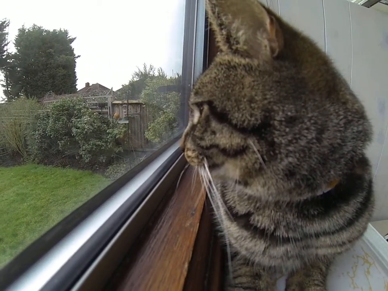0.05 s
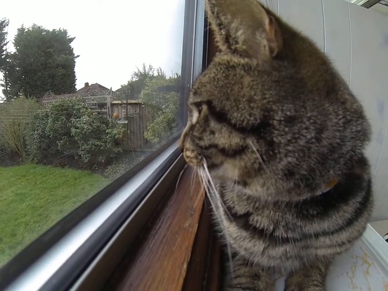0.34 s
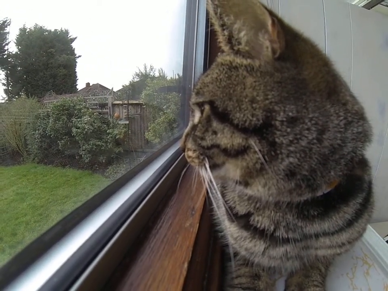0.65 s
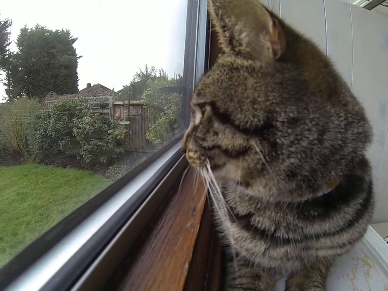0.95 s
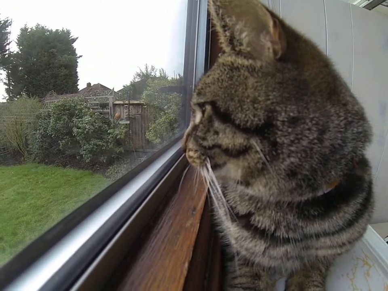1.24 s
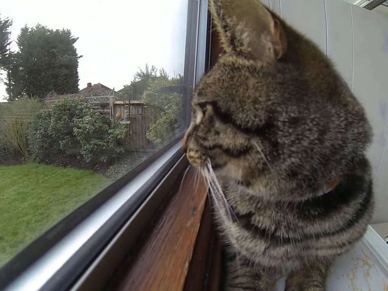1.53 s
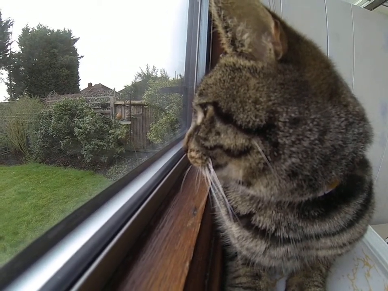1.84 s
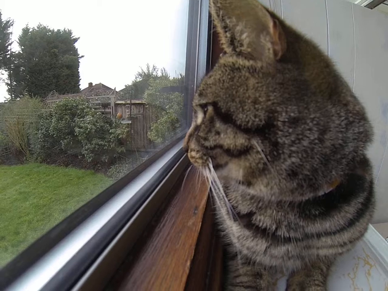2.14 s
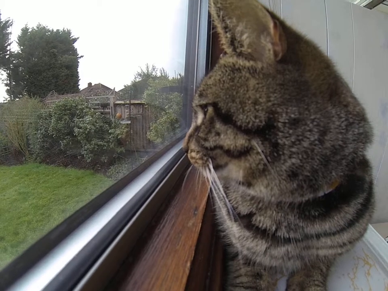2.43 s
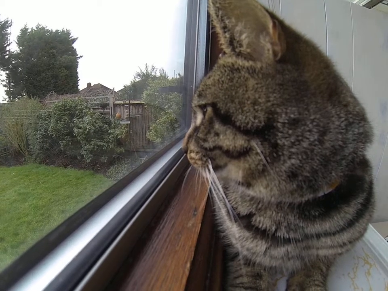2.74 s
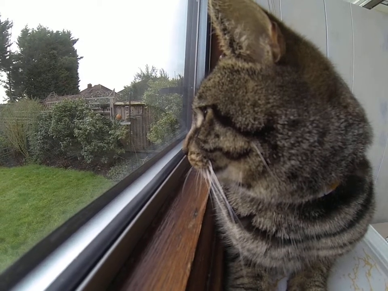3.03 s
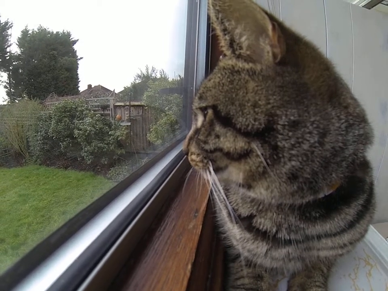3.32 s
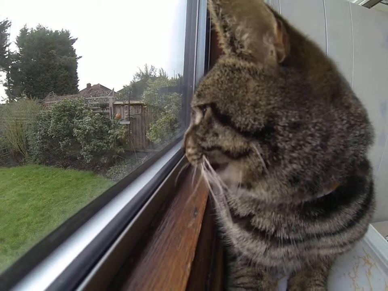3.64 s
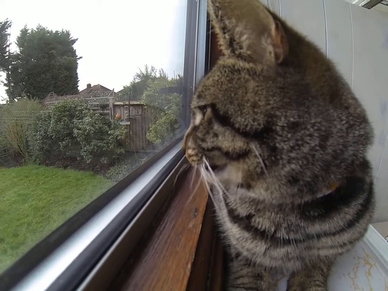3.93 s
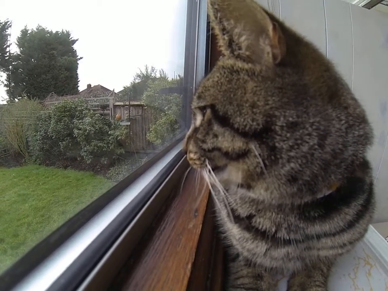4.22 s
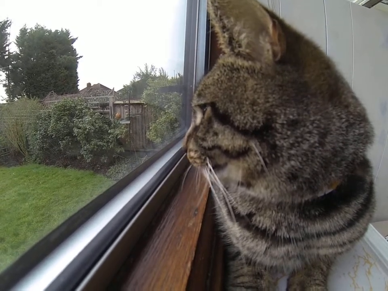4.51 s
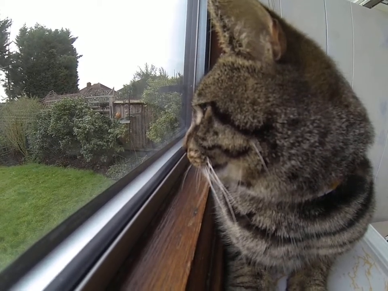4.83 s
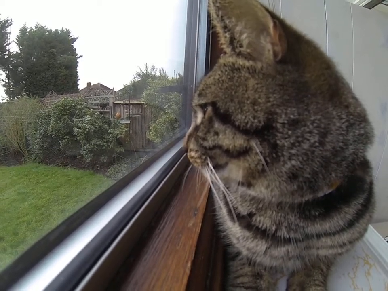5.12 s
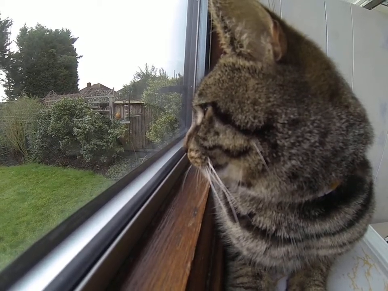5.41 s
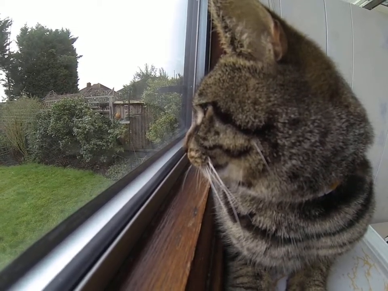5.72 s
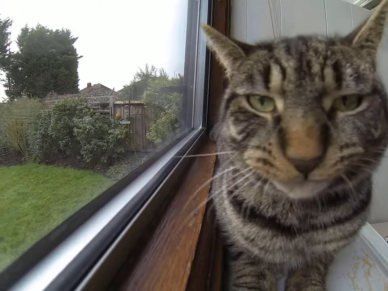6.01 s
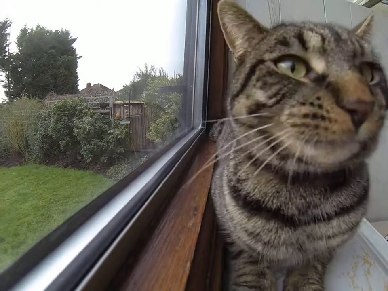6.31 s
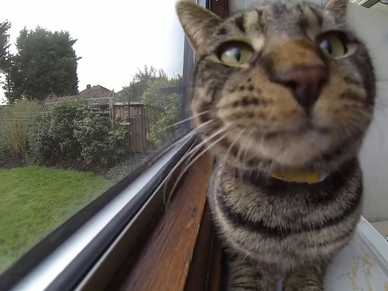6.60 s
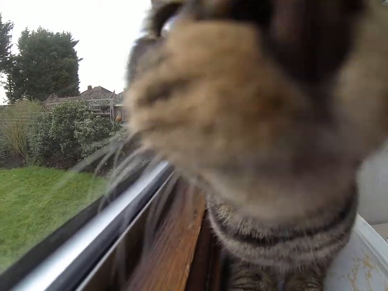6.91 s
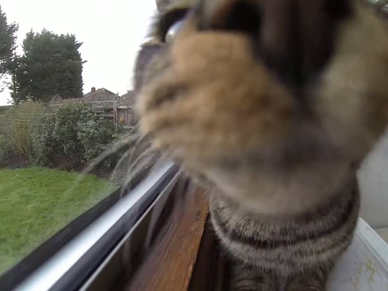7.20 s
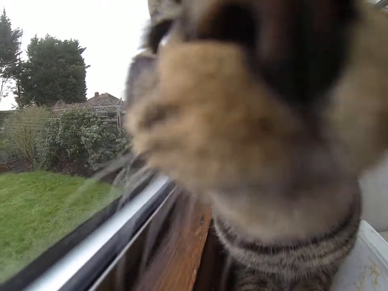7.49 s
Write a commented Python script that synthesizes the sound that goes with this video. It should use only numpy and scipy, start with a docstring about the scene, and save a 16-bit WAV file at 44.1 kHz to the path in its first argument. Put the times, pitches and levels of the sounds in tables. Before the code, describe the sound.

A low motor hum and rumble fill a quiet room. After a few seconds a cat, close to the microphone, clicks its mouth open and gives a tiny chirp that trails into a whisper, then chatters again with only breath and clicks. About two seconds later it smacks its lips and gives one brief falling mew. Faint ticks and brushing fur follow, with traffic barely audible outside.

```python
"""A cat chattering on a window sill

Close by, a cat's jaw clicks open and a short chirp trails off into a whisper; a second try stays
voiceless, then the cat turns round and gives one brief falling mew. Vocal folds, rushing air and snaps of
tongue and lips are the sources; throat and mouth are the filter. Behind it a household motor hums over
low rumble, distant traffic and a far gliding tone, and a camera's electronics whine faintly."""
import sys
import numpy as np
from scipy import signal
from scipy.fft import rfft, irfft
from scipy.io import wavfile
from scipy.ndimage import uniform_filter1d

SR = 44100
rng = np.random.default_rng(int(sys.argv[2]) if len(sys.argv) > 2 else 0)


def pcm_store(signal):
    """Save signal as 16-bit PCM."""
    levels = np.round(np.clip(np.atleast_2d(signal), -1, 1) * 32767)
    wavfile.write(sys.argv[1], SR, levels.astype(np.int16).T)


N = 341775
TIME = np.arange(N) / SR
FREQ = np.fft.rfftfreq(N, 1 / SR) + 1e-3
TOP_HZ = 14950

# formants of the throat with the jaw open: centre_hz, width_hz, relative_db
OPEN_FORMANTS = [(445, 560, 11), (865, 410, 6.5), (1360, 430, 5.5), (2020, 600, 1), (3200, 2000, -16)]
# bands of hiss at the teeth with the jaw open: centre_hz, width_hz, relative_db
OPEN_HISS = [(4540, 650, -5.5), (5340, 600, -9), (5530, 550, 3.5), (6500, 630, -3), (7700, 1200, -12.5)]


def voice(jitter, end_jitter, shimmer_db, harmonics=12):
    """Source and filter: the vocal folds' harmonics arch in pitch and glide through the throat's formants."""
    # throat response, jaw open (chirp) and nearly shut (mew): frequency_hz, relative_db
    chirp_response = [(680, 0.5), (1360, -0.5), (2040, -10.5), (2720, -22), (3400, -29), (4080, -26),
                      (4760, -21), (5440, -26), (6800, -32), (8100, -44)]
    mew_response = [(690, 2), (1380, -11), (2080, -18), (2450, -4), (2780, -12), (3460, -20.5), (4150, -23),
                    (4850, -47), (5300, -47), (5560, -27), (6200, -37), (8300, -47)]
    # calls: start_s, length_s, top_pitch_hz, fall_share, level_db, release_s, tilt_db_per_octave, jaw
    calls = [(3.6476, 0.062, 686, 0.047, -39, 0.031, 0.5, "open"),
             (5.9882, .083, 694, .31, -30, 0.058, 0.84, "shut")]
    attack_s, dull_db_per_octave, brighten_s = 0.0095, 6.5, 0.0096
    crest_share = .18  # the pitch peaks this far into the call
    rasp_db, rasp_hz, rasp_width_hz = -11, 2700, 650
    throats = {"open": chirp_response, "shut": mew_response}
    out, k = np.zeros(N), np.arange(1, harmonics + 1)[:, None]
    for start_s, length_s, top_hz, fall, db, release_s, bright_db, jaw in calls:
        t = TIME[:int(length_s * SR)]
        wobble, shimmer = walk(340)[:len(t)], walk(140)[:len(t)]
        leak = noise(resonance(rasp_hz, rasp_width_hz))[:len(t)]
        sag = ((t / length_s - crest_share) / (1 - crest_share)) ** 2
        pitch_hz = top_hz * (1 - fall * sag)
        phase = 2 * np.pi * np.cumsum(pitch_hz * (1 + (jitter + end_jitter * sag) * wobble)) / SR
        tilt_db = bright_db - dull_db_per_octave * np.exp(-t / brighten_s)
        gains = undb(np.interp(k * pitch_hz, *np.transpose(throats[jaw])) + tilt_db * np.log2(k))
        tone = np.sum(gains * np.sin(k * phase), axis=0) / np.sqrt(np.sum(gains ** 2, axis=0) / 2)
        # air leaks through the folds once a cycle, the more the further the pitch has sagged
        rasp = undb(rasp_db) * np.sqrt(fall * sag) * (1 + np.cos(phase)) * leak
        envelope = ease(t / attack_s) * ease((length_s - t) / release_s)
        add(out, start_s, (tone + rasp) * envelope * undb(db + shimmer_db * shimmer))
    return out


def whisper(flutter):
    """Turbulence: voiceless puffs of air rush in the throat and hiss at the teeth, sputtering together."""
    # throat formants and hiss at the teeth, jaw nearly shut: centre_hz, width_hz, relative_db
    shut_formants = [(630, 240, 4), (1320, 290, -4), (2340, 790, -4), (3380, 750, -14)]
    shut_hiss = [(5500, 600, 7), (6300, 1100, 0), (7300, 1000, -14)]
    # puffs of breath: start_s, length_s, rush_db, hiss_db, jaw
    puffs = [(3.610, 0.079, -57, -65.5, "open"), (3.694, 0.08, -50.5, -61.5, "open"),
             (3.882, 0.032, -57, -67.5, "open"), (3.942, 0.047, -57, -65.5, "open"),
             (3.999, 0.042, -53.5, -64, "open"), (4.026, 0.024, -51.5, -59, "open"),
             (4.051, 0.032, -49, -57.5, "open"), (5.942, .075, -68, -71, "shut"),
             (6.013, 0.066, -47.5, -64.5, "shut")]
    attack_s, decay_s, rush_sag_db_per_s = 0.0094, 0.01, 74
    air = {"open": (formant_noise(OPEN_FORMANTS), formant_noise(OPEN_HISS)),
           "shut": (formant_noise(shut_formants), formant_noise(shut_hiss))}
    out, t = np.zeros(N), TIME[:SR // 4]
    for start_s, length_s, rush_db, hiss_db, jaw in puffs:
        rush, hiss = (np.roll(sound, -rng.integers(N))[:len(t)] for sound in air[jaw])
        flow = ease(t / attack_s) * np.exp(-np.maximum(t - length_s, 0) / decay_s)
        add(out, start_s, flow * (undb(rush_db - rush_sag_db_per_s * t) * rush + undb(hiss_db) * hiss))
    return out * unit(1 + flutter * np.tanh(walk(300)))


def smacks(wet_db, wet_s, cutoff_hz):
    """Impulse response: tongue and lips part with a snap that rings the mouth; a wet fizz follows."""
    # damped modes of the mouth: frequency_hz, relative_db, t60_s
    modes = [(706, 3.5, 0.0015), (1510, 2.5, 0.003), (2140, -3, 0.0044), (3040, 4, 0.0012),
             (4270, -9, 0.0025), (5050, -3, 0.0079), (5530, -11.5, 0.02), (6240, -33, 0.0028),
             (7600, -21, .004)]
    # snaps: start_s, peak_db, tilt_db_per_octave, mode_frequency_ratio
    snaps = [(3.6112, -38, -7, 1), (3.6351, -24.5, 0, 1), (3.9606, -31, -6, 1), (4.0413, -44, 0, 1),
             (6.0182, -27.5, -2.5, 1.2), (6.0290, -27, -2.5, 1.15)]
    out, t = np.zeros(N), TIME[:SR // 20]
    fizz = formant_noise(OPEN_FORMANTS + OPEN_HISS)
    low_pass = signal.butter(8, cutoff_hz, fs=SR, output="sos")
    for start_s, db, tilt_db, ratio in snaps:
        ring = sum(undb(mode_db + tilt_db * np.log2(hz / 1000) - 60 * t / t60_s)
                   * np.sin(2 * np.pi * hz * ratio * t) for hz, mode_db, t60_s in modes)
        ring = signal.sosfilt(low_pass, ring)
        tail = undb(wet_db) * np.exp(-t / wet_s) * fizz[int(start_s * SR):][:len(t)]
        add(out, start_s, undb(db) * (tail - ring / np.abs(ring).max()))
    return out


def stirring(spread, t60_s):
    """Transients: the cat's small movements tick, each a damped burst of band-limited noise."""
    # dry ticks: start_s, peak_db, centre_hz
    ticks = [(.3043, -50.5, 6500), (.7628, -54, 5000), (1.255, -54, 2600), (2.054, -52, 7500),
             (5.866, -48, 3000), (6.471, -51, 2840), (6.5465, -52.5, 3600), (6.6163, -53, 13000),
             (6.6968, -56, 5000), (6.877, -50.5, 4500), (7.0804, -52, 10000), (7.098, -55, 3800)]
    out, t = np.zeros(N), TIME[:SR // 20]
    for start_s, db, hz in ticks:
        edges_hz = [hz / (1 + spread), min(hz * (1 + spread), TOP_HZ)]
        band = signal.butter(2, edges_hz, "band", fs=SR, output="sos")
        tick = signal.sosfilt(band, rng.standard_normal(len(t)) * undb(-60 * t / t60_s))
        add(out, start_s, undb(db) * tick / np.abs(tick).max())
    return out


def fur(grains_per_s, grain_s):
    """Friction: fur and whiskers brush close by, and each random snag releases a grain of hiss."""
    # course of the brushing: time_s, level_db
    brushing = [(6.4, -86), (6.65, -76.5), (6.85, -71.5), (6.95, -82), (7.3, -80)]
    gate, db = curves(brushing)
    hiss = formant_noise([(3380, 650, 6), (5600, 1300, 0), (8500, 3000, -5), (12500, 3500, -14)])
    snags = (rng.random(N) < grains_per_s / SR) * rng.random(N)
    grains = signal.fftconvolve(snags, np.exp(-TIME[:SR // 20] / grain_s))[:N]
    return gate * undb(db) * unit(hiss * grains)


def nose_whistle():
    """A near-pure tone: the nose whistles briefly just before the mew."""
    # course of the whistle: time_s, pitch_hz, level_db
    glide = [(5.970, 8900, -85), (5.981, 8820, -65), (5.988, 8760, -67), (5.993, 8720, -85)]
    return thin_tone(glide, waver=.001)


def alcove(x, pane_s, pane_db, room_db, t60_s):
    """Early reflection and reverberation: the pane throws the sound back, the room adds a faint tail."""
    t = TIME[:SR // 2]
    response = rng.standard_normal(len(t)) * undb(-60 * t / t60_s)
    response *= undb(room_db) / np.linalg.norm(response)
    response[0] += 1  # direct sound
    add(response, pane_s, undb(pane_db) * np.hanning(5) / 2)
    return signal.fftconvolve(x, response)[:N]


def motor(drift_rad, beat_hz, beat_db, crest_s):
    """A harmonic series: the motor's hum drifts in phase and beats slowly in level."""
    # harmonics of the hum: frequency_hz, rms_db
    partials = [(49.3, -54), (98.6, -42.5), (147.9, -54), (197.2, -71), (246.5, -70.5)]
    hum = sum(undb(db) * np.sin(2 * np.pi * (hz * TIME + rng.random()) + drift_rad * walk(0.66))
              for hz, db in partials)
    beat = undb(beat_db * np.cos(2 * np.pi * beat_hz * (TIME - crest_s)))
    return np.sqrt(2) * hum * beat


def room(hiss_db, wander_db):
    """Standing waves: room modes boom as narrow bands of noise over a soft broadband hiss."""
    # room modes kept going by the rumble: centre_hz, width_hz, rms_db
    modes = [(18.5, 3.4, -70), (32.6, 29, -54), (79.6, 1.02, -51), (200.6, 3.1, -62), (255.7, 34, -70.5)]
    # spectral density of the background noise: frequency_hz, relative_db
    spectrum = [(12, -85.5), (40, -68), (60, -67.5), (110, -74), (160, -71), (220, -78.5), (400, -80),
                (600, -86.5), (1300, -90.5), (2200, -100), (5000, -106), (10000, -111), (12000, -112),
                (14500, -109)]
    boom = sum(undb(db) * noise(resonance(hz, width_hz)) for hz, width_hz, db in modes)
    hz, db = np.transpose(spectrum)
    hiss = noise(undb(np.interp(np.log(FREQ), np.log(hz), db)) * (FREQ > hz[0]))
    return boom + hiss * undb(hiss_db + wander_db * walk(0.5))


def rumble(hz, wander_db):
    """Random modulation: a deep drone wavers in level and pitch."""
    # course of the drone: time_s, level_db
    levels = [(0, -48), (.6, -42), (5.3, -44.5), (5.8, -48), (7.75, -45)]
    _, db = curves(levels)
    wander = undb(wander_db * walk(4))
    return undb(db) * unit(wander * np.sin(2 * np.pi * hz * TIME + 0.47 * walk(1.2)))


def bump():
    """Narrow-band noise with a quick rise and decay: a dull, soft bump somewhere in the house."""
    # course of the bump: time_s, level_db
    levels = [(3.30, -75), (3.385, -51.5), (3.42, -59.5), (3.52, -73)]
    return swell(levels, hz=351, width_hz=54)


def far_whine(flicker_db):
    """Frequency glide: a faint far tone sinks, then climbs, while its level flickers."""
    # course of the tone: time_s, pitch_hz, level_db
    glide = [(0, 1000, -71), (1.05, 820, -70.5), (1.30, 1060, -84), (1.33, 1088, -62.5),
             (1.41, 1155, -64.5), (1.46, 1190, -79), (2.5, 1670, -80), (2.83, 1790, -75), (3.0, 1830, -90)]
    return thin_tone(glide, waver=0.0089) * unit(undb(flicker_db * walk(31)))


def traffic():
    """Band-limited noise: distant traffic merges into a wash that ebbs and returns."""
    # course of the wash: time_s, level_db
    levels = [(0, -72), (1, -72), (2.5, -81), (5.5, -73), (6.6, -72), (7.2, -68.5), (7.75, -70)]
    return swell(levels, hz=875, width_hz=550)


def camera_whine(hz, waver_hz, db, suboctave_db, readout_hz, duty):
    """Pulse modulation: the electronics sing in regular bursts, with a weaker tone an octave below."""
    cycle = (TIME * readout_hz - .7) % 1
    bursts = uniform_filter1d((cycle < duty) * 1., SR // 700)
    phase = 2 * np.pi * np.cumsum(hz + waver_hz * walk(170)) / SR
    return np.sqrt(2) * bursts * (undb(db) * np.sin(phase) + undb(suboctave_db) * np.sin(phase / 2))


def thin_tone(glide, waver):
    """Frequency modulation: an unsteady sine follows rows of time_s, pitch_hz, level_db."""
    gate, hz, db = curves(glide)
    phase = 2 * np.pi * np.cumsum(hz * (1 + waver * walk(56))) / SR
    return gate * np.sqrt(2) * undb(db) * np.sin(phase)


def swell(levels, hz, width_hz):
    """Amplitude envelope: a band of noise follows rows of time_s, level_db."""
    gate, db = curves(levels)
    return gate * undb(db) * noise(resonance(hz, width_hz))


def formant_noise(formants):
    """Noise through parallel resonances, which add in power and leave deep valleys between them."""
    power = sum(undb(db) ** 2 * resonance(hz, width_hz) ** 4 for hz, width_hz, db in formants)
    return noise(np.sqrt(power))


def resonance(hz, width_hz):
    """Gain of a band-pass with steep skirts."""
    return 1 / (1 + ((FREQ ** 2 - hz ** 2) / (FREQ * width_hz * np.pi / 2)) ** 2)


def noise(gain):
    """Noise of rms 1, shaped by the given gain at each frequency."""
    return unit(irfft(rfft(rng.standard_normal(N)) * gain, N))


def walk(rate_hz):
    """Random fluctuation of rms 1, mostly slower than rate_hz."""
    return noise(np.exp(-(FREQ / rate_hz) ** 2))


def curves(table):
    """A gate that is open while the table lasts, then each column interpolated linearly in time."""
    times_s, *columns = np.transpose(table)
    gate = (TIME >= times_s[0]) & (TIME <= times_s[-1])
    return [gate] + [np.interp(TIME, times_s, column) for column in columns]


def ease(x):
    """A raised-cosine step from 0 to 1 as x goes from 0 to 1."""
    return np.sin(np.pi / 2 * np.clip(x, 0, 1)) ** 2


def add(out, start_s, sound):
    """Mix a short sound in at start_s."""
    i = int(start_s * SR)
    out[i:i + len(sound)] += sound[:N - i]


def undb(db):
    """Decibels to gain."""
    return 10 ** (np.asarray(db) / 20)


def unit(x):
    """Scale to rms 1."""
    return x / np.sqrt(np.mean(x ** 2))


def scene():
    """Superposition: the cat in its window corner over the sounds of house and garden."""
    cat = voice(jitter=.004, end_jitter=.012, shimmer_db=.6)
    cat += smacks(wet_db=-30, wet_s=0.0017, cutoff_hz=7500)
    cat += stirring(spread=0.44, t60_s=0.013) + fur(grains_per_s=130, grain_s=0.0014)
    cat += whisper(flutter=0.2) + nose_whistle()
    near = alcove(cat, pane_s=.0014, pane_db=-24, room_db=-26, t60_s=.25)
    outside = far_whine(flicker_db=2.1) + traffic()
    indoors = motor(drift_rad=0.084, beat_hz=1.353, beat_db=1.5, crest_s=0.26)
    indoors += room(hiss_db=-53, wander_db=0.56) + rumble(hz=27.94, wander_db=1.5) + bump()
    whine = camera_whine(hz=12890, waver_hz=55, db=-71.0, suboctave_db=-76.5, readout_hz=47.945, duty=.42)
    return (near + outside + indoors + whine)[None]


def record(dry):
    """Band limiting: a steep low-pass cuts the treble above TOP_HZ."""
    return signal.sosfilt(signal.ellip(10, .1, 80, TOP_HZ, fs=SR, output="sos"), dry)


dry = scene()
out = record(dry)
pcm_store(out)
```